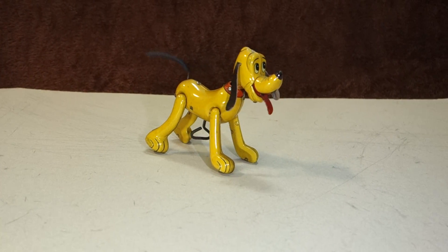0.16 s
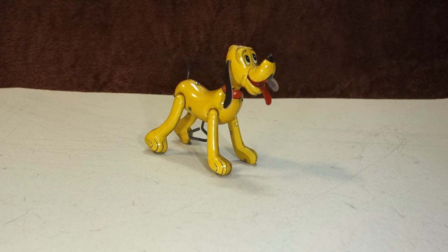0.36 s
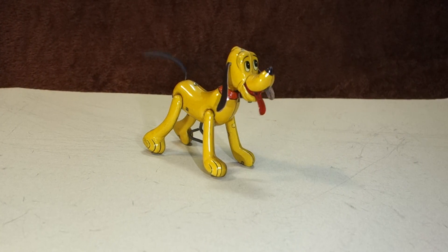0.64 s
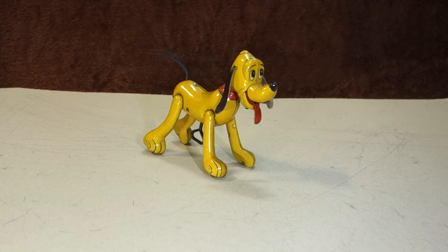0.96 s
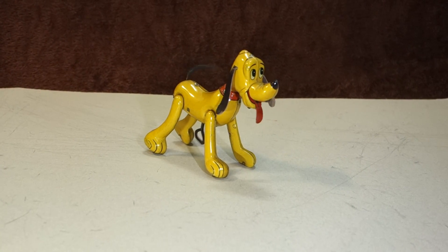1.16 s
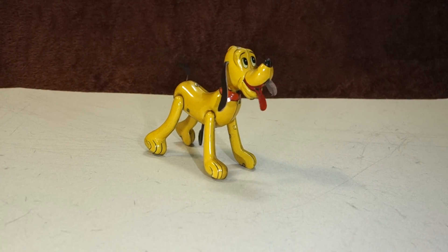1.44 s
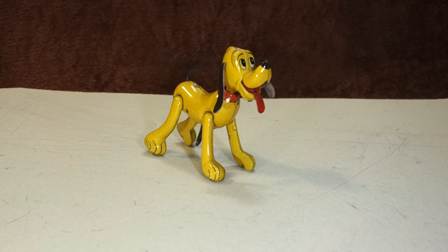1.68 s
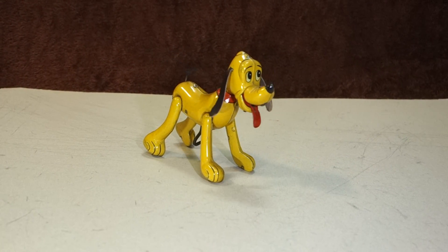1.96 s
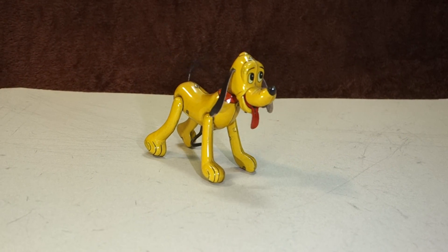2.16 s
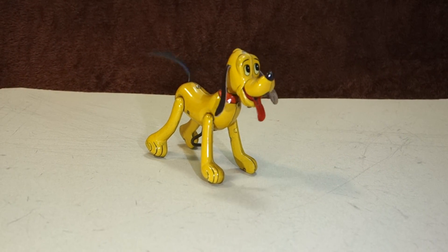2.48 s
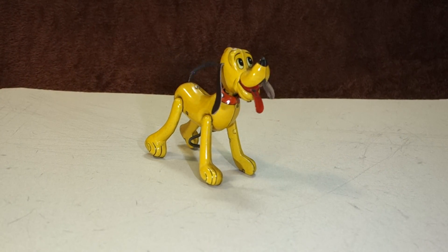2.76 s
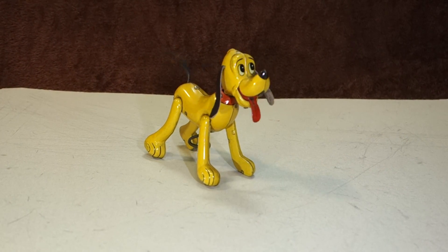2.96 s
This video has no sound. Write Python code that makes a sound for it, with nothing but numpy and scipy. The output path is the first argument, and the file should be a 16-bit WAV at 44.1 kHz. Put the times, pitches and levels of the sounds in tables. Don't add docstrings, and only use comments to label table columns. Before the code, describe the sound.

A tin clockwork toy dog rattles about seventeen times a second on a table, gears whirring and feet tapping, swelling and easing unevenly; small quiet room, close stereo camera microphone.

```python
import sys
import numpy as np
from scipy import signal
from scipy.fft import rfft, irfft
from scipy.io import wavfile
from scipy.ndimage import uniform_filter1d

SR = 44100
rng = np.random.default_rng(int(sys.argv[2]) if len(sys.argv) > 2 else 0)


def voltage_ratio(level):
    return 10 ** (np.asarray(level, float) / 20)


def unload_wav(signal):
    wavfile.write(
        sys.argv[1],
        SR,
        np.round(np.clip(np.atleast_2d(signal).T, -1, 1) * 32767).astype(np.int16),
    )


N = 137592


def level(x, db):
    return x * voltage_ratio(db) / np.sqrt(np.mean(x ** 2))


def ring(x, hz, width_hz):
    radius = np.exp(-np.pi * width_hz / SR)
    turn = 2 * np.pi * hz / SR
    return signal.lfilter([np.sin(turn)], [1, -2 * radius * np.cos(turn), radius ** 2], x)


def clicks(times, sizes):
    at = np.clip(np.ravel(times) * SR, 0, N - 1).astype(int)
    return np.bincount(at, np.ravel(sizes), N)


def colour(x, table):
    hz, db = np.array(table, float).T
    f = np.maximum(np.arange(N // 2 + 1) * SR / N, 1)
    return irfft(rfft(x) * voltage_ratio(np.interp(np.log(f), np.log(hz), db)), N)


def walk(rate_hz):
    hold = int(SR / rate_hz)
    steps = np.repeat(rng.standard_normal(N // hold + 1), hold)
    smooth = uniform_filter1d(steps, hold)[:N]
    return smooth / smooth.std()


def tail(x, t60_s):
    t = np.arange(SR // 2) / SR
    echoes = rng.standard_normal(SR // 2) * 1000. ** (-t / t60_s)
    return signal.fftconvolve(x, echoes / np.sqrt(np.sum(echoes ** 2)))[:N]


# (frequency [Hz], level [dB per Hz])
AIR_COLOUR = [(30, -20), (70, -10), (180, -7), (400, -17), (16000, -25.5)]
# (frequency [Hz], width [Hz], level [dB])
HUM_BANDS = [(48.2, 4.2, -74.5), (238, 7.5, -65)]
# (time [s], level [dB])
DRONE_LEVEL = [(0, -62), (.15, -64), (.3, -66), (.85, -71), (1.1, -60), (1.3, -67.5), (2.05, -69),
               (2.15, -63.5), (2.42, -69), (2.52, -61), (2.66, -64), (2.76, -60), (3.12, -72)]
AIR_DB, DRONE_HZ = -55, 96.4


def room_tone():
    air = level(colour(rng.standard_normal(N), AIR_COLOUR), AIR_DB)
    hum = 0
    for hz, width, db in HUM_BANDS:
        once = ring(rng.standard_normal(N), hz, width)
        hum = hum + level(ring(once, hz, width), db)
    turns = np.cumsum(DRONE_HZ * (1 + 0.03 * walk(5.54))) / SR
    swell = voltage_ratio(np.interp(np.arange(N) / SR, *np.array(DRONE_LEVEL).T))
    drone = np.sqrt(2) * swell * np.sin(2 * np.pi * turns)
    return air + hum + drone


DETUNE = 0.037


def tin(times, sizes, body, vary_db):
    gains = voltage_ratio(vary_db * rng.standard_normal((len(times), len(body))))
    out = 0
    for k, (hz, width, db) in enumerate(body):
        struck = sizes * gains[:, [k]]
        loudness = voltage_ratio(db) * np.sqrt(width / 300)
        for seat in range(3):
            pitch = hz * (1 + DETUNE * np.sin(k + 2 * seat))
            out = out + loudness * ring(clicks(times[seat::3], struck[seat::3]), pitch, width)
    return out


# (frequency [Hz], level [dB], T60 [s])
TABLE_MODES = [(510, -7.5, 0.016), (597, -10.5, 0.024), (834, -21, 0.17), (984.3, -12, 0.15),
               (1024.3, -11, 0.1), (1130, -11, 0.051), (1246, -6.5, 0.042), (1072, -8, 0.028),
               (1423, -12, 0.051), (1319, -11, .03)]


def table_top(push, deep_push):
    out = 0
    for k, (hz, db, t60_s) in enumerate(TABLE_MODES):
        drive = deep_push if k < 2 else push
        out = out + voltage_ratio(db) * ring(drive, hz, np.log(1000) / np.pi / t60_s)
    return out


# (frequency [Hz], width [Hz], level [dB])
PANEL_MODES = [(1705, 290, 1), (2052, 62, 2.5), (2427, 23, 3), (2346, 87, -3), (3000, 710, 8),
               (3246, 110, -4.5)]
# (frequency [Hz], width [Hz], level [dB])
PART_MODES = [(3740, 540, -10), (4850, 71, -13.5), (5270, 150, -16), (5900, 1130, -7), (6963, 400, -3.5),
              (7500, 160, -5.5), (8240, 400, -2), (9460, 850, -4.5), (11940, 2440, -1), (13900, 190, -13),
              (14000, 1200, -35)]
# (time [s], level [dB], share of the big panels [dB])
GEAR_LOAD = [(0, -43.5, 0.5), (.2, -48, 1), (.4, -49, 1.5), (.7, -46, -1.5), (.9, -43, -0.5),
             (1.2, -47.5, -2), (1.55, -51.5, -2), (1.9, -48, -1.5), (2.1, -50.5, 0.5), (2.4, -54, 0.5),
             (2.56, -51, -6), (2.75, -53, 1.5), (3.12, -49, 0)]
GEAR_DB, GEAR_PANEL_DB, GEAR_TABLE_DB = -1, -1.5, -18


def gears():
    draw = rng.random((320, 4, 40))
    times = (np.arange(len(draw))[:, None] + draw[:, 0]) * N / SR / len(draw)
    sign = np.sign(draw[:, 1] - .5)
    sizes = sign * voltage_ratio(-2.5 * np.log(draw[:, 2] + 0.0029) + 10 * draw[:, 3, :1])
    t, load_db, panel_db = np.array(GEAR_LOAD).T
    now = np.arange(N) / SR
    load = voltage_ratio(np.interp(now, t, load_db))
    share = voltage_ratio(np.interp(now, t, panel_db))
    parts = level(tin(times, sizes, PART_MODES, 2.8), GEAR_DB)
    panels = level(tin(times, sizes, PANEL_MODES, 6.2), GEAR_PANEL_DB)
    teeth = clicks(times, sizes)
    table = level(table_top(teeth, teeth), GEAR_TABLE_DB)
    return load * (parts + share * panels + table)


# (time [s], level [dB])
EARLY_SHAKES = [(0.0297, -15), (0.039, -32), (0.0874, -17), (0.1409, -16.5), (0.1706, -23.5),
                (0.188, -23.5), (0.1912, -26), (0.1959, -25), (0.2494, -27), (0.305, -31), (0.3605, -31),
                (0.3745, -28.5), (0.4183, -27), (0.4592, -33.5), (0.4672, -26.5), (0.5122, -25.5),
                (0.5202, -28), (0.5642, -25.5), (0.5747, -25), (0.6177, -20), (0.6285, -26.5),
                (0.6728, -18), (0.68, -26.5), (0.6958, -33), (0.7242, -26.5), (0.7324, -30),
                (0.7779, -19.5), (0.782, -23), (0.787, -33), (0.8266, -21), (0.833, -19), (0.8654, -22.5),
                (0.8878, -14), (0.944, -15), (1.0008, -14.5), (1.0586, -13), (1.1157, -16.5), (1.124, -34),
                (1.1701, -23), (1.1751, -18.5), (1.1831, -29), (1.2303, -18.5), (1.2376, -34),
                (1.2792, -30), (1.2852, -20.5), (1.2917, -24), (1.3399, -23.5), (1.3473, -27.5),
                (1.395, -26), (1.3988, -21), (1.4067, -23), (1.4559, -22.5), (1.4645, -23.5),
                (1.5157, -23.5), (1.5238, -22.5), (1.5333, -30.5), (1.574, -19)]
# (time [s], level [dB])
LATE_SHAKES = [(1.585, -34), (1.593, -32), (1.6323, -19), (1.6414, -32), (1.6906, -20), (1.7029, -22.5),
               (1.7478, -21.5), (1.757, -24), (1.8071, -20.5), (1.8158, -23.5), (1.8637, -22.5),
               (1.8706, -27.5), (1.9186, -20.5), (1.926, -27), (1.951, -23.5), (1.9794, -18), (1.9849, -22),
               (2.036, -17), (2.0431, -18.5), (2.0927, -18), (2.101, -22.5), (2.1248, -27.5), (2.1546, -18),
               (2.1631, -29), (2.1826, -27), (2.215, -18.5), (2.2234, -32.5), (2.2727, -16.5),
               (2.2885, -23.5), (2.3362, -19.5), (2.3474, -33), (2.393, -22), (2.4023, -28), (2.451, -22),
               (2.4571, -25), (2.464, -31.5), (2.5101, -28.5), (2.519, -27.5), (2.577, -29.5),
               (2.6272, -22), (2.6368, -24), (2.664, -32), (2.6846, -26), (2.6979, -27.5), (2.7499, -24),
               (2.7638, -27), (2.8137, -24), (2.873, -24.5), (2.882, -32.5), (2.8885, -27.5), (2.9463, -33),
               (2.9567, -30), (3.0038, -26), (3.018, -34), (3.0632, -24.5), (3.0754, -34), (3.1174, -23.5)]
# (time [s], level [dB])
FORERUNNERS = [
    (1.9757, -24.5),
    (2.088, -34),
    (2.624, -33),
    (2.935, -33),
]
SHAKE_DB, PANEL_DB, CRACK_DB, SHAKE_TABLE_DB = -30, -11, -27, -25.5
LEAD_S, SPREAD_S = .0034, .0026
TRAIL_DB, TRAIL_S = -7.5, .012


def rattle():
    t, db = np.array([*EARLY_SHAKES, *LATE_SHAKES, *FORERUNNERS]).T[:, :, None]
    draw = rng.random((2 * len(t), 4, 130))
    spread = np.vstack([0 * t + SPREAD_S, 0 * t + TRAIL_S])
    t = np.vstack([t, t])
    db = np.vstack([db, db + TRAIL_DB])
    chance = draw[:, 0] * np.roll(draw[:, 0], 1, axis=1) * np.roll(draw[:, 0], 2, axis=1)
    wait = -np.log(chance + 1e-9) / 2
    times = t - LEAD_S + spread * (1 + .4 * (draw[:, 3, :1] - .5)) * wait
    sizes = np.sign(draw[:, 1] - .5) * voltage_ratio(db - 2.11 * np.log(draw[:, 2] + 0.064) - wait)
    hits = clicks(times, sizes)
    crack = signal.lfilter([1, -1], 1, hits)
    load_t, _, load_panel_db = np.array(GEAR_LOAD).T
    share = voltage_ratio(PANEL_DB + np.interp(t, load_t, load_panel_db))
    parts = tin(times, sizes, PART_MODES, 3.41)
    panels = tin(times + .003, sizes * share, PANEL_MODES, 3.4)
    table = voltage_ratio(SHAKE_TABLE_DB) * table_top(hits, hits)
    return voltage_ratio(SHAKE_DB) * (parts + voltage_ratio(CRACK_DB) * crack + panels + table)


# (time [s], level [dB], depth [dB])
EARLY_KNOCKS = [(0.0311, -39, 2), (0.0756, -29, -5), (0.1285, -30, -2), (0.144, -38, -4), (0.168, -26.5, 4),
                (0.1835, -28.5, -3), (0.2189, -28.5, -2), (0.2389, -29, -3), (0.2662, -26.5, -2),
                (0.2884, -24.5, -4), (0.3213, -33, 2), (0.3398, -27, -4), (0.3742, -25, 0),
                (0.3955, -28.5, 0), (0.4292, -31, 4), (0.4523, -29.5, -7), (0.4812, -28.5, 3),
                (0.5039, -25.5, -3), (0.5344, -27.5, 2), (0.5578, -25.5, -3), (0.587, -22.5, 2),
                (0.6152, -25.5, -5), (0.6428, -24.5, -4), (0.6664, -29, -7), (0.6938, -27.5, 1),
                (0.7131, -23.5, -6), (0.7511, -38, -5), (0.7673, -22, -3), (0.8056, -34, -5),
                (0.8322, -26.5, -4), (0.8713, -28.5, -16), (0.8882, -33, -14), (0.9336, -28.5, -6),
                (0.9484, -46, -5), (0.9684, -42, -8), (0.9999, -36, -4), (1.0557, -33, 0),
                (1.1061, -31, -1), (1.1464, -29, 3), (1.1688, -29.5, 1), (1.1984, -33.5, 5),
                (1.2206, -31.5, 0), (1.2496, -27.5, 0), (1.2749, -30, -4), (1.3094, -27, 1),
                (1.3287, -26, -4), (1.364, -33, 6), (1.3874, -29, -1), (1.4202, -24.5, -2),
                (1.4455, -30.5, 3), (1.4795, -33, 7)]
# (time [s], level [dB], depth [dB])
LATE_KNOCKS = [(1.51, -30, 1), (1.5405, -30, -1), (1.5637, -29.5, 1), (1.5955, -27, 1), (1.6224, -28, -3),
               (1.6551, -29, 2), (1.6869, -31, -4), (1.7122, -28.5, 3), (1.7376, -27, -4),
               (1.7747, -31, -3), (1.7948, -23.5, -3), (1.8283, -26.5, 5), (1.8563, -27.5, 2),
               (1.8866, -28.5, 7), (1.9135, -24.5, -1), (1.9485, -25.5, 1), (1.966, -25.5, -14),
               (1.9838, -41, -3), (2.0187, -28, -4), (2.0413, -28, -4), (2.0832, -28.5, -2),
               (2.1105, -25.5, -2), (2.1527, -26.5, -7), (2.1748, -28, 0), (2.2167, -26, 0),
               (2.2656, -28.5, 0), (2.2948, -34, 3), (2.3633, -32, -8), (2.3874, -26, -3),
               (2.4185, -36, -3), (2.4446, -34.5, 6), (2.4745, -31.5, 0), (2.5038, -39, 7),
               (2.5358, -45, -3), (2.5665, -34.5, -6), (2.597, -39, -3), (2.622, -37, -1),
               (2.6516, -33.5, 6), (2.6812, -35.5, 4), (2.7114, -33.5, 5.5), (2.7424, -28.5, -1),
               (2.8059, -31.5, -5), (2.8358, -28.5, 2), (2.8682, -29.5, -1), (2.8962, -27.5, 3),
               (2.9284, -31, 5), (2.9607, -32.5, -1), (2.9878, -28.5, -3.5), (3.0463, -29, 2),
               (3.078, -32, 5), (3.1053, -28.5, -5)]
KNOCK_DB, KNOCK_S, KNOCK_LAG_S = -4, 0.00032, 0.00098
BOUNCE_S, BOUNCE_DB = 0.004093, -10.5


def feet():
    t, db, deep_db = np.array([*EARLY_KNOCKS, *LATE_KNOCKS]).T
    late, strength = rng.standard_normal((len(t), 2)).T
    t = t + KNOCK_LAG_S
    bounce_t = t + BOUNCE_S * (1 + 0.12 * late)
    pulse = np.exp(-(2 * np.arange(64) / SR / KNOCK_S - 2) ** 2)

    def push(knock_db):
        first = clicks(t, -voltage_ratio(knock_db))
        bounce = clicks(bounce_t, -voltage_ratio(knock_db + BOUNCE_DB + 3.3 * strength))
        return signal.lfilter(pulse / pulse.sum(), 1, first + bounce)

    return voltage_ratio(KNOCK_DB) * table_top(push(db), push(db + 0.8 * deep_db))


# (time [s], pitch [Hz], level [dB])
FREE_PANELS = [
    (.144, 2050, -39),
    (.889, 2030, -34),
    (1.832, 2400, -40),
    (2.041, 2410, -35),
    (2.104, 2040, -40.5),
]


def pings():
    out = 0
    for t, hz, db in FREE_PANELS:
        draw = rng.random((2, 6))
        taps = clicks(t + .008 * draw[0], voltage_ratio(db) * np.sign(draw[1] - .5))
        out = out + ring(taps, hz, 65)
    return out


# (frequency [Hz], level [dB])
STEREO_WIDTH = [(60, -19), (300, -10), (1000, -9.5), (2400, -6.5), (4400, -1), (15000, -2)]
LOW_CUT_HZ, ROOM_T60_S, ROOM_DB = 446, 0.45, -10
NEAR_T60_S, RIGHT_DB = 0.023, 0.74


def scene():
    toy = gears() + rattle() + feet() + pings()
    toy = signal.sosfilt(signal.butter(3, LOW_CUT_HZ, "high", fs=SR, output="sos"), toy)
    mid = room_tone() + toy + voltage_ratio(ROOM_DB) * tail(toy, ROOM_T60_S)
    near = sum(tail(mid * walk(24.996), NEAR_T60_S) for _ in range(4))
    side = voltage_ratio(-8) * colour(near, STEREO_WIDTH)
    return np.array([mid + side, mid - side]) * voltage_ratio(np.array([[-RIGHT_DB], [RIGHT_DB]]))


def top_cut(x):
    return signal.sosfilt(signal.butter(12, 16050, fs=SR, output="sos"), x)


TOP_HZ = 15900


def record(dry):
    cut = signal.sosfilt(signal.ellip(10, .2, 70, TOP_HZ, fs=SR, output="sos"), dry)
    return top_cut(cut)


dry = scene()
out = record(dry)
unload_wav(out)
```